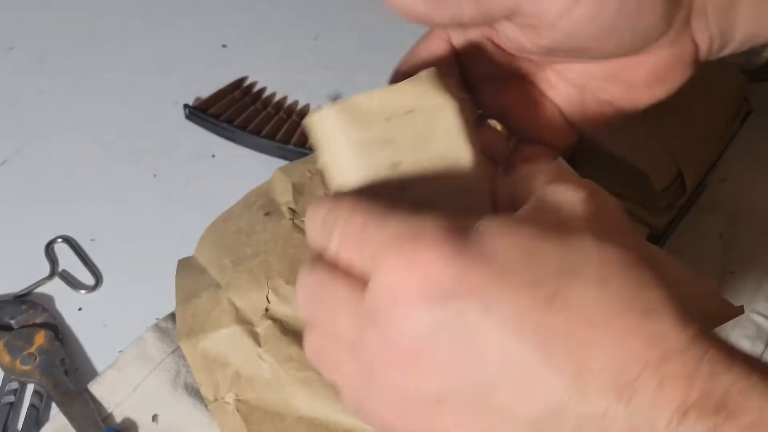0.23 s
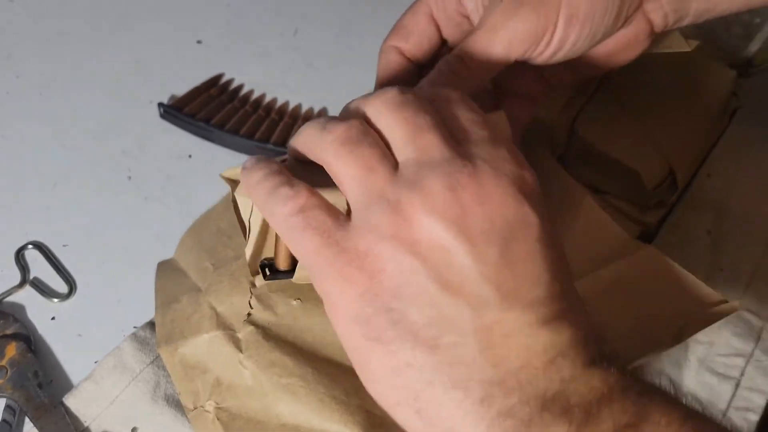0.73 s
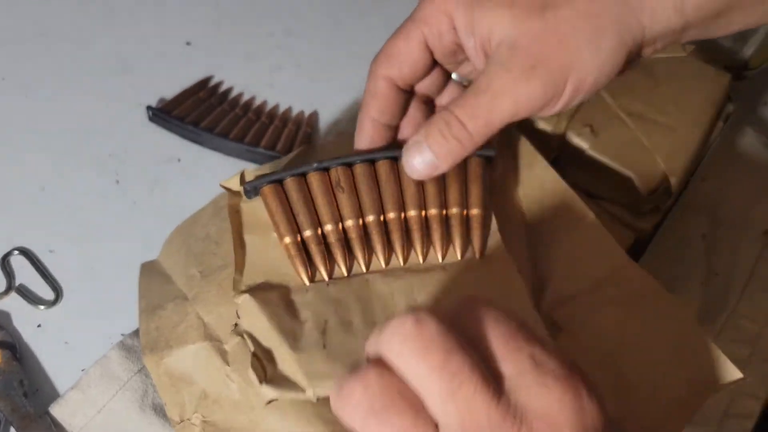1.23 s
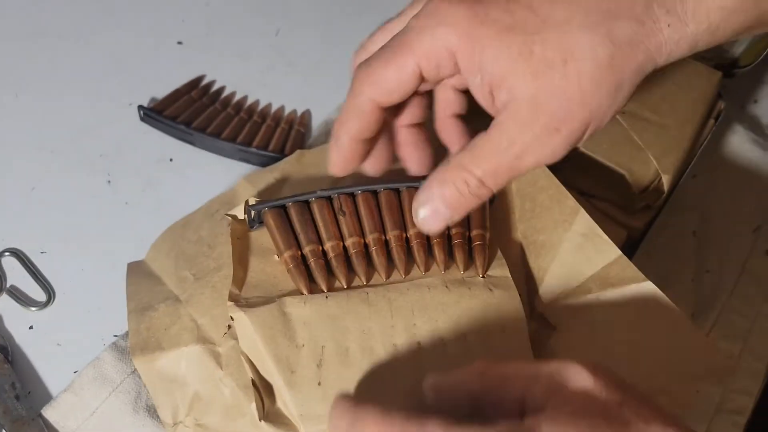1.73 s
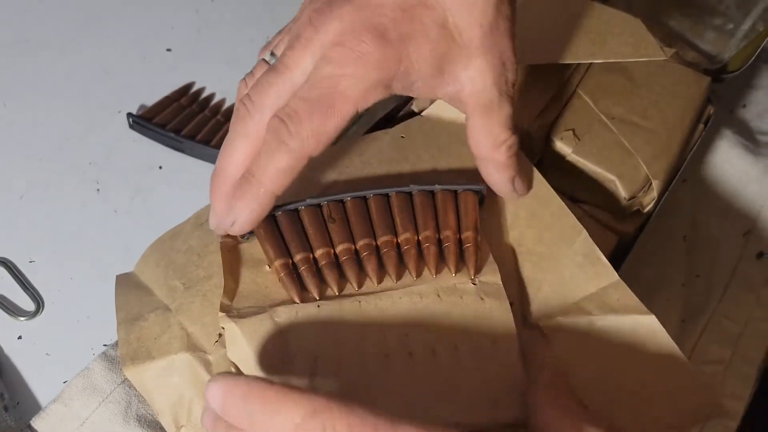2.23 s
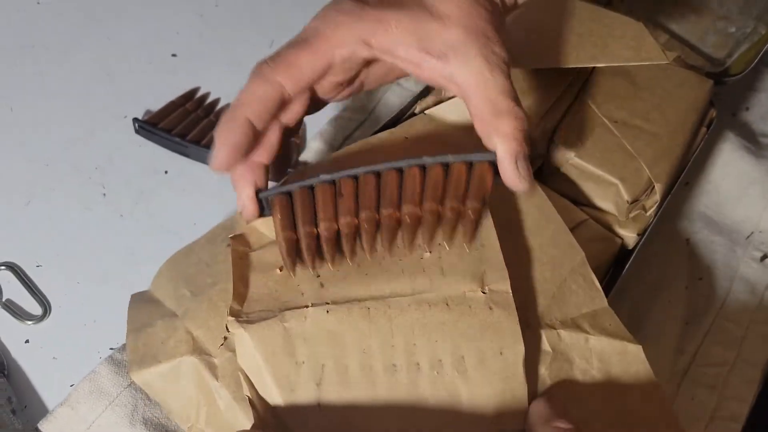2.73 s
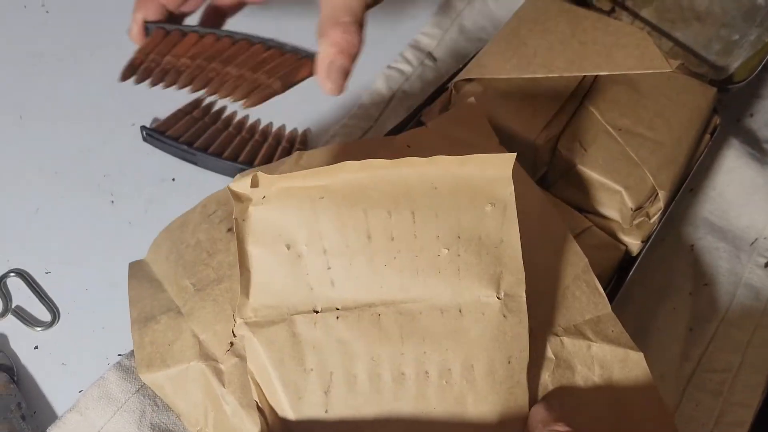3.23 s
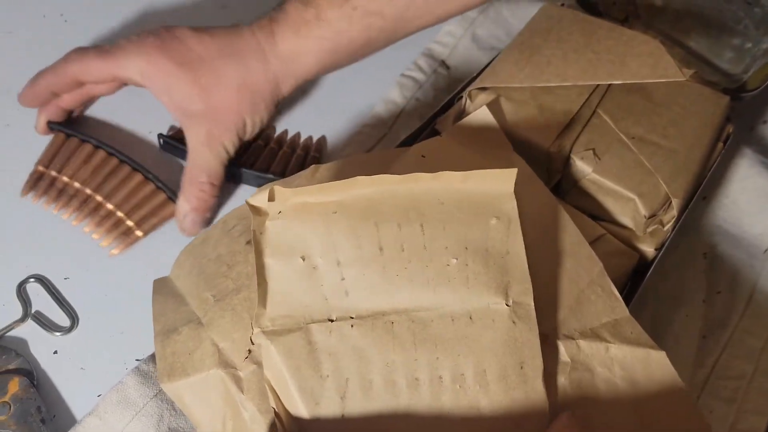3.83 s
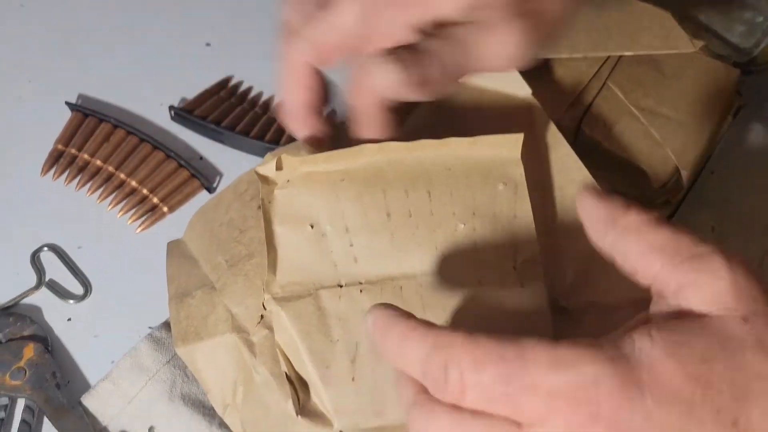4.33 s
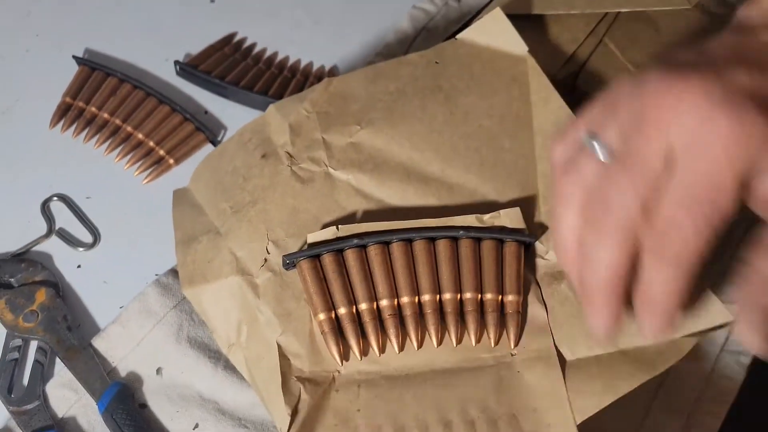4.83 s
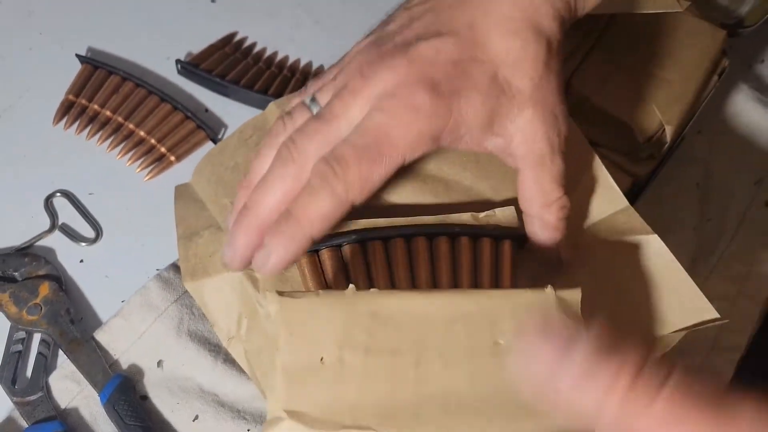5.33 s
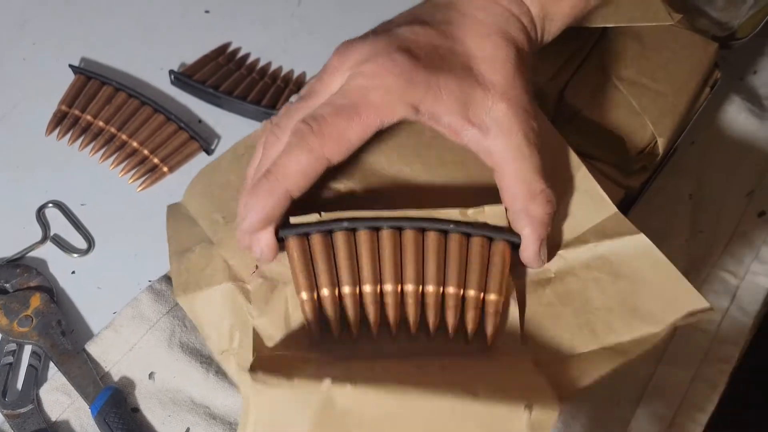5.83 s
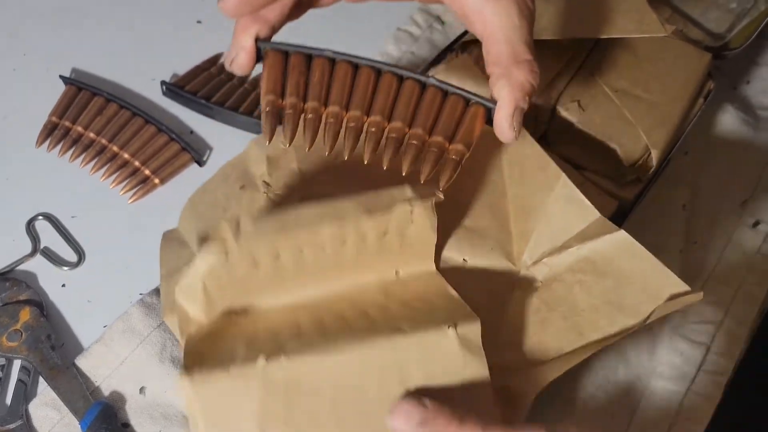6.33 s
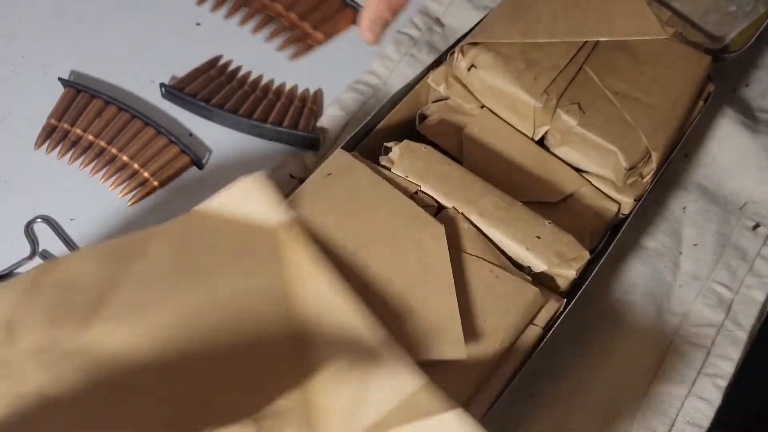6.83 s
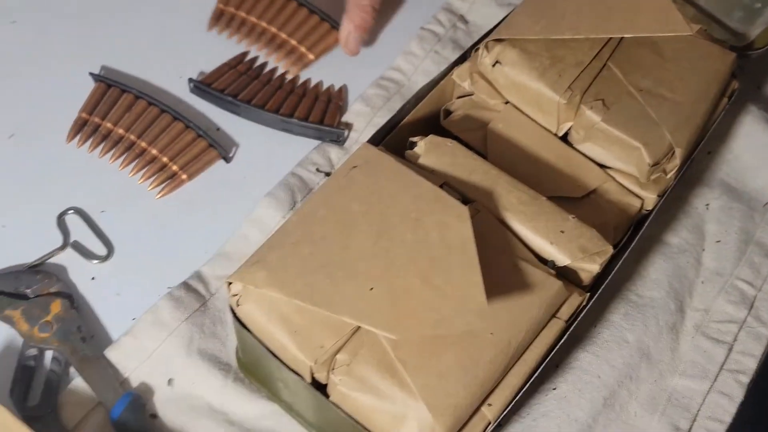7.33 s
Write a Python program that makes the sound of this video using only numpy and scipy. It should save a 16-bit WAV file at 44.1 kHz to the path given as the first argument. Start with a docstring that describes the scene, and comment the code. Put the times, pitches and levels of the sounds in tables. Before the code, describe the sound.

Hands unwrap stiff paper packets close to the microphone in a small room. The paper rustles, and its creases snap in uneven bursts, mixed with light clatters of metal cartridge clips. After a brief lull near the middle, a clip clicks down on the table and the crackling picks up again. A few dull thumps come as packets bump the pile, with a faint hush underneath.

```python
"""Stiff paper packets crackle as hands unwrap them and lay steel cartridge clips on a table.
Creases snap and clips clatter in short bursts of noise, over a rustle of rubbing and tiny cracks.
Hands and packets thump the pile, and moving sheets puff air at a phone just above them.
The ceiling echoes, a small room adds a short tail, and a faint hush lies under it all.
The phone hears in stereo through two ports, the little holes in front of its microphones."""
import sys
import numpy as np
from scipy import signal
from scipy.fft import rfft, irfft
from scipy.io import wavfile
from scipy.ndimage import uniform_filter1d, map_coordinates

SR = 44100
rng = np.random.default_rng(int(sys.argv[2]) if len(sys.argv) > 2 else 0)


def persist_wave(psi):
    """Save psi, clipped to +-1, as 16-bit WAV."""
    counts = np.round(np.clip(psi, -1, 1) * 32767).astype(np.int16)
    wavfile.write(sys.argv[1], SR, np.atleast_2d(counts).T)


N = 334278

# The paper's sound has three ranges: body (low), crisp (middle) and air (high).
# Hand moves that rustle the paper: t/s, hold/s, crisp level/dB, body over crisp/dB, air over crisp/dB,
# crackle (0 is a smooth slide, 1 is full crackle)
HAND_MOVES = [(0, 0.099, -48, -17, 0, 0.5), (0.242, 0.0042, -38, -39, -4, 0.8),
              (0.27, 0.5, -44, -41, -2, 0), (0.353, 0.0049, -31, -24, 2.5, 0.24),
              (0.47, 0.0074, -46.5, -16, 8, 0.8), (0.6, 0.023, -41, -21, -15, 0.4),
              (0.662, 0.092, -37.5, -17, -11, 0.5), (0.785, 0.044, -43, -16, -6, 0.5),
              (0.872, 0.074, -33, -16, -1.5, 0.9), (0.95, 0.55, -44.5, -8, -4, 0.8),
              (1.47, 0.055, -34, -10, -25, 0.7), (1.539, 0.015, -26.5, -7.5, -4, 0.9),
              (1.61, 0.067, -40, -14, -7, 0.56), (1.926, 0.081, -38.5, -18, -6.5, 0),
              (1.96, 0.47, -46.5, -7, -17, 0.9), (2.41, 0.36, -39.5, -11.5, -6, 1),
              (2.78, 0.22, -47.5, -12.5, -24, 0.7), (2.858, 0.031, -38.5, -32, -7.5, 0.7),
              (3.06, 0.4, -64.5, -15, -20, 0.33), (3.521, 0.27, -61.5, 0, -12, 0.16),
              (3.8, 0.2, -59, -15, -22, 0.9), (3.905, 0.022, -38.5, -13, -48, 0.8),
              (4.035, 0.016, -41, -3, -26, 0.75), (4.372, 0.51, -47, -8, -3.5, 0.37),
              (4.68, 0.05, -47, -14, -3, 0.8), (4.86, 0.076, -43, -18, -12.5, 1),
              (5.001, 0.016, -30.5, -1, -10, 1), (5.06, 0.055, -48, 11, -9, 0.83),
              (5.385, 0.023, -51.5, -1.5, -20, 0.14), (5.43, 0.12, -56, -2, -17, 0.6),
              (5.566, 0.38, -40.5, -7.5, -6, 1), (5.991, 0.071, -30, -5.5, -10, 0.65),
              (6.08, 0.17, -39, -16, -0.5, 0.4), (6.3, 0.16, -39, -14, -1.5, 0.7),
              (6.49, 0.04, -52, -15, -3, 0.3), (6.55, 0.063, -40, -19, 0.5, 0.5),
              (6.638, 0.22, -40, -23, 0.5, 0), (6.9, 0.082, -61, -17, -28, 0.8),
              (7.026, 0.0074, -39.5, -17, -6.5, 0.24), (7.171, 0.024, -37, 0.5, -18, 0.5),
              (7.22, 0.13, -43, -13, -21, 0.3), (7.359, 0.2, -36.5, -7.5, -13, 0.47)]
# Creases snapping and clips clattering: peak t/s, crisp level/dB, body over crisp/dB,
# air over crisp/dB, own pitch f/Hz, basic time to fade by 60 dB/s
SNAPS_AND_CLATTERS = [(0.0478, -25, -15.5, -27, 2600, 0.024), (0.2154, -31, -20, -22, 3270, 0.03),
                      (0.2316, -26.5, -20.5, -33.5, 3390, 0.025), (0.3425, -18.5, -44.5, -15, 4650, 0.089),
                      (0.4592, -22.5, -17, -14, 4000, 0.03), (0.493, -40, -2, -18, 3620, 0.033),
                      (0.532, -35.5, -40, -21, 4260, 0.036), (0.6027, -36.5, 0.5, -48, 840, 0.072),
                      (0.7087, -25, -10.5, -22, 3150, 0.077), (0.8664, -39, -20, 1, 4410, 0.03),
                      (0.8928, -13, -16, -20, 3200, 0.028), (0.9023, -8.5, -25, -17.5, 3280, 0.023),
                      (0.948, -17.5, -25, -29, 4940, 0.063), (1.1062, -26.5, -4.5, -33, 3580, 0.023),
                      (1.1377, -30, -24, -15, 3300, 0.03), (1.1835, -31, -10, -8, 5510, 0.02),
                      (1.2048, -10, -23.5, -27, 3630, 0.023), (1.256, -12.5, -21, -24.5, 845, 0.052),
                      (1.272, -10.5, -18.5, -11.5, 3420, 0.036), (1.3068, -15.5, -18.5, -28, 560, 0.03),
                      (1.3423, -20.5, -8, -23.5, 5300, 0.014), (1.3733, -21.5, -11, -25, 1280, 0.043),
                      (1.4115, -21.5, -3.5, -28.5, 1090, 0.013), (1.4633, -29, -11.5, -23.5, 1360, 0.034),
                      (1.5037, -21, -26, -29, 3280, 0.025), (1.5269, -7.5, -20.5, -20, 3420, 0.036),
                      (1.5338, -6.5, -20.5, -16.5, 4870, 0.019), (1.5575, -8, -17, -25, 2250, 0.037),
                      (1.5713, -8, -15.5, -22.5, 3990, 0.023), (1.6497, -15, -11, -34, 1766, 0.031),
                      (1.6713, -17, -13.5, -24, 1060, 0.032), (1.905, -32.5, -26, -16, 2980, 0.063),
                      (2.0537, -23, -13.5, -13, 970, 0.037), (2.0811, -9, -18, -21, 920, 0.024),
                      (2.105, -20.5, -14, -27, 870, 0.047), (2.1568, -23.5, -7.5, -51, 910, 0.022),
                      (2.2501, -11, -15, -27, 3230, 0.011), (2.3077, -21.5, -10.5, -17, 980, 0.02),
                      (2.401, -23, -19, -32, 786, 0.035), (2.4112, -12, -8.5, -23.5, 3380, 0.026),
                      (2.4458, -21, -16.5, -45, 1830, 0.034), (2.5365, -8, -21, -14.5, 3960, 0.023),
                      (2.5644, -26.5, -3, -23, 1318, 0.024), (2.6108, -23, -5.5, -32.5, 4670, 0.02),
                      (2.6252, -13, -13.5, -25, 830, 0.02), (2.6388, -12, -11.5, -9, 5650, 0.032),
                      (2.669, -21.5, -19, -20, 4180, 0.064), (2.7067, -15.5, -20, -21, 2880, 0.033),
                      (2.7506, -21, -15, -21, 877, 0.018), (2.818, -17, -21.5, -28, 1180, 0.016),
                      (2.8696, -22, -53, -17, 3600, 0.043), (2.885, -25, -30, -12, 4590, 0.03),
                      (2.9104, -31, -10, -26, 4260, 0.03), (2.9342, -25.5, -6.5, -46.5, 3200, 0.039),
                      (2.9504, -29.5, -12, -36, 3180, 0.027), (2.9834, -23, -21, -30.5, 3540, 0.028),
                      (3.0013, -12, -36, -32.5, 5060, 0.025), (3.1264, -41.5, -18, -46, 1012, 0.03),
                      (3.531, -48.5, -33, -25, 3570, 0.052), (3.6064, -47.5, 4, -29, 1420, 0.027),
                      (3.7915, -39.5, 8.5, -30, 1310, 0.027), (3.8056, -27, -11, -42, 3400, 0.014),
                      (3.8824, -15.5, -11, -41.5, 3250, 0.049), (4.0124, -28.5, 1.5, -42, 1340, 0.053),
                      (4.0218, -23, -19, -40, 2980, 0.04), (4.0325, -17.5, -14, -47, 2810, 0.045),
                      (4.121, -43, -27, -37, 3480, 0.042), (4.36, -27, -25, -16, 3520, 0.041),
                      (4.383, -35, -13, -29, 3450, 0.03), (4.4653, -35, -14, -22, 3040, 0.03),
                      (4.4804, -30.5, -7, -36, 1220, 0.03), (4.5046, -30, -9.5, -32, 3440, 0.022),
                      (4.5173, -19, -16, -32, 980, 0.033), (4.6134, -35, -2, -28, 721, 0.075),
                      (4.656, -36.5, 0, -15, 845, 0.038), (4.6846, -25, -6.5, -33.5, 890, 0.023),
                      (4.7985, -33.5, -4, -34, 894, 0.03), (4.8354, -23, -31, -49.5, 905, 0.051),
                      (4.8434, -3.5, -20, -24, 3970, 0.037), (4.8874, -28.5, -3, -23.5, 1110, 0.025),
                      (4.9292, -14, -8.5, -13.5, 4800, 0.09), (4.9553, -17, -22, -16.5, 4070, 0.034),
                      (4.9911, -6.5, -9, -21, 3780, 0.02), (5.069, -20, -9.5, -25.5, 1445, 0.045),
                      (5.118, -33.5, -14, -6, 3630, 0.025), (5.1367, -36.5, -2, -8.5, 633, 0.04),
                      (5.377, -37, -14.5, -25, 4940, 0.062), (5.5505, -28, -11, -16, 4300, 0.035),
                      (5.5888, -20, -13, -23, 4110, 0.03), (5.6001, -17.5, -16, -41, 895, 0.023),
                      (5.657, -32.5, 15.5, -24, 1370, 0.034), (5.7426, -14, -15, -22.5, 3950, 0.015),
                      (5.7713, -18, -32, -21.5, 3830, 0.03), (5.7932, -23, -11.5, -25, 1020, 0.034),
                      (5.8445, -22, -16.5, -16.5, 939, 0.046), (5.9643, -24, -6, -22, 2920, 0.03),
                      (6.0008, -12, -29, -24, 3800, 0.01), (6.0292, -10.5, -18, -26, 3470, 0.052),
                      (6.0544, -17, -26, -43, 3110, 0.047), (6.072, -20.5, -10, -29, 1350, 0.041),
                      (6.091, -19.5, -20, -29, 3170, 0.035), (6.1293, -20, -18, -42, 982, 0.064),
                      (6.1507, -28, -1, -28, 1517, 0.077), (6.3, -28.5, -14, -22, 4510, 0.049),
                      (6.353, -31.5, -8, -18, 890, 0.048), (6.4437, -23.5, -16, -29, 3130, 0.087),
                      (6.4584, -23.5, -9, -11, 3460, 0.04), (6.5351, -4.5, -16.5, -27, 1080, 0.019),
                      (6.5697, -14, -23, -17, 4860, 0.026), (6.7096, -31, -21, -26, 4000, 0.037),
                      (6.8747, -50, 2.5, -21, 4910, 0.03), (7.115, -45, 19, -38, 860, 0.034),
                      (7.1437, -23.5, -17, -63, 855, 0.03), (7.1593, -32.5, -11.5, -30, 1070, 0.033),
                      (7.1836, -15.5, -16.5, -39, 2130, 0.033), (7.273, -31, -27, -30, 2640, 0.039),
                      (7.3301, -26.5, -1, -34, 2690, 0.032), (7.3611, -11, -16, -27.5, 3550, 0.023),
                      (7.4077, -16, -22, -51, 800, 0.03), (7.4981, -12.5, -7.5, -29, 1370, 0.019),
                      (7.559, -35, -1.5, -24, 3180, 0.028)]
# How the two ports colour the sound: f/Hz, left level/dB, right level/dB, left phase lead/rad
PORT_RESPONSE = [(150, 0.5, -7, 0.2), (356, -7.5, -5, 0.17), (463, -7, -3.5, 2.27), (519, 1, -6, 2.55),
                 (840, 5, -6.5, 0.99), (970, 3.5, 1, 1.9), (1454, 3, 1.5, 1.95), (1800, -5, -2.5, 5.7),
                 (2180, -1, -0.5, 2.45), (3180, -2, 0.5, 5.47), (5880, -8, -3, 10.24),
                 (7530, -13.5, -15.5, 11), (9000, -25.5, -39.5, 13), (12750, -19.5, -19, 20)]
# Tone colour of the background hush: f/Hz, level/dB
HUSH_SPECTRUM = [(15, -50), (25, 4.5), (169, -8), (260, 3), (469, -2), (782, -9.5), (1710, -11),
                 (4620, -10.5), (6550, -16), (7700, -34.5), (8580, -51), (13200, -21), (15500, -21)]
# Hands and packets pushing the pile: t/s, level/dB
PILE_PUSHES = [(0.733, -55.5), (0.915, -53), (1.267, -53), (1.551, -44.5), (2.09, -61), (2.415, -59),
               (2.937, -64), (3.891, -60), (4.03, -51), (4.362, -58), (4.475, -52), (4.69, -60),
               (4.952, -35), (5.557, -51), (6.05, -45), (6.46, -53), (7.19, -62), (7.365, -52)]
# Tone colour of those pushes: f/Hz, level/dB
PUSH_SPECTRUM = [(24, -29.5), (40, -5.5), (92, -1.5), (172, -1), (263, -2.5), (450, 0), (580, -48),
                 (990, -120)]
# Packets knocking on the pile: t/s, level/dB, f/Hz
PACKET_KNOCKS = [(0.727, -36, 221), (1.259, -54, 130), (1.531, -27.5, 330), (2.410, -28, 297),
                 (2.444, -35, 293), (4.020, -39.5, 199), (4.686, -35.5, 317), (4.947, -30.5, 95.7),
                 (6.028, -35, 300)]
# Air pushed at the ports by moving sheets: middle t/s, level/dB
AIR_PUFFS = [(.98, -62), (1.579, -57), (1.849, -61), (3.99, -61.5), (6.27, -60), (6.8, -71)]

BAND_EDGES_HZ = 220 * 2 ** (np.arange(23) / 3.55)  # the paper's sound is built in narrow bands
BAND_CENTRES_HZ = np.sqrt(BAND_EDGES_HZ[:-1] * BAND_EDGES_HZ[1:])
BIN_HZ = np.fft.rfftfreq(N, 1 / SR)  # the frequency of each point (bin) in a spectrum
TOP_HZ = 15700
FADE_60_DB = np.log(1000)  # exp(-FADE_60_DB * t / t60) falls by 60 dB in t60 seconds


def undb(db):
    """Turn decibels into a gain to multiply by."""
    return 10 ** (np.asarray(db) / 20)


def unit(x):
    """Scale a signal to an average power of 1."""
    return x / np.sqrt(np.mean(x ** 2))


def on_log_hz(hz, values):
    """Join a few points into a curve with a value for every frequency bin."""
    return np.interp(np.log(BIN_HZ + 1), np.log(hz), values)


def coloured(x, spectrum):
    """Give a signal the tone colour in a table of f/Hz, level/dB."""
    return irfft(rfft(x) * undb(on_log_hz(*np.transpose(spectrum))), N)


def wander(per_s):
    """A smooth random curve that heads for a new value per_s times a second."""
    hold = int(SR / per_s)
    steps = np.repeat(rng.standard_normal(N // hold + 1), hold)
    return unit(uniform_filter1d(uniform_filter1d(steps, hold), hold)[:N])


def blend(body_db, crisp_db, air_db, band):
    """Mix the levels of the three ranges into the level of one band."""
    pitch, anchors = np.log(BAND_CENTRES_HZ[band]), np.log([1200, 2100, 4500, 9500])
    body_share = np.interp(pitch, anchors, [0.56, 0.02, 0, 0.0077])
    air_share = np.interp(pitch, anchors, [0.004, 0.00068, 0.1, 0.68])
    return crisp_db + body_share * (body_db - crisp_db) + air_share * (air_db - crisp_db)


def strokes(at_s, hold_s, db, rise_db_per_s, fall_db_per_s):
    """The total level in dB of hand strokes that each swell, hold and die away."""
    t = np.arange(0, N / SR + .002, .002)[:, None]
    before_s, after_s = np.maximum(at_s - t, 0), np.maximum(t - at_s - hold_s, 0)
    each_db = db - rise_db_per_s * before_s - fall_db_per_s * after_s
    power = np.sum(undb(2 * each_db), axis=1)
    return np.interp(np.arange(N) / SR, t[:, 0], 10 * np.log10(power + 1e-12))


def rustle():
    """Paper rubs while hands move: gives crisp, body and air levels in dB, and the share of crackle."""
    at_s, hold_s, db, body_db, air_db, crackle = np.transpose(HAND_MOVES)
    crackle_db = 10 * np.log10(np.clip(crackle, .01, 1))
    crisp, body, air, cracked = (
        strokes(at_s, hold_s, db + extra_db, rise_db_per_s=455, fall_db_per_s=269)
        for extra_db in (0, body_db, air_db, crackle_db))
    return crisp, body, air, undb(2 * (cracked - crisp))


def cracks(count=1800, spread_db=6.5, tint_db=7, smooth_rub=0.88, rise_s=.0012, t60_s=.035):
    """Paper gives way in tiny random cracks: yields their power over a smooth rub, band by band."""
    when, chance = rng.random((2 * count)).reshape(count, 2).T
    size_db = -spread_db * np.log(chance + .04)  # many small cracks, few big ones
    tint = uniform_filter1d(rng.standard_normal((count, len(BAND_EDGES_HZ))), size=3)
    rise_and_fade = np.poly([np.exp(-2 * FADE_60_DB / (t60_s * SR)), np.exp(-1 / (rise_s * SR))])
    for band in range(len(BAND_CENTRES_HZ)):
        size = undb(size_db + tint_db * tint[:, band])  # each crack has its own tone colour
        clicks = np.zeros(N)
        np.add.at(clicks, (when * N).astype(int), size ** 2)
        power = signal.lfilter([1], rise_and_fade, clicks)
        yield smooth_rub + power / np.median(uniform_filter1d(power, size=4000))


def snaps_and_clatters(band, pitch_boost_db=7, pitch_width_octaves=0.18, linger=0.34):
    """A crease snaps or a clip lands: power in one band, boosted and longer near its own pitch."""
    power = np.zeros(N)
    for peak_s, db, body_db, air_db, hz, t60_s in SNAPS_AND_CLATTERS:
        rise_s = 0.061 * t60_s  # slow crunches also swell slowly
        start = int((peak_s - rise_s) * SR)
        t = np.arange(min(int(.25 * SR), N - start)) / SR
        closeness = np.exp(-.5 * (np.log2(BAND_CENTRES_HZ[band] / hz) / pitch_width_octaves) ** 2)
        fade_s = t60_s * (1 + linger * closeness)
        shape = np.minimum(t / rise_s, np.exp(-FADE_60_DB * (t - rise_s) / fade_s))
        gain = undb(db + pitch_boost_db * closeness + blend(body_db, 0, air_db, band))
        power[start:start + len(t)] += (gain * shape) ** 2
    return power


def paper_and_clips(snap_trim_db=(2, -8, 2), rustle_trim_db=-5, grit_db=3, drift_db=2.5, apart_hz=2500):
    """Rustle, snaps and clatters shape the same noise in all bands, so a crack is one broad click."""
    crisp_db, body_db, air_db, crackle = rustle()
    pickup_db = port_pickup_db()
    grit = unit(undb(grit_db * wander(per_s=1500)))  # fibres give way in sharp, uneven jerks
    noise, other_noise = grit * rng.standard_normal((2, N))
    drift = [wander(per_s=14) for _ in BAND_EDGES_HZ[::2]]  # the rub's colour wanders, in band pairs
    slope_hz = np.r_[150, BAND_CENTRES_HZ]  # each band slopes away to its neighbours' centres
    spectrum = 0
    for band, crack_power in enumerate(cracks()):
        rub_db = blend(body_db, crisp_db, air_db, band) + rustle_trim_db + drift_db * drift[band // 2]
        rustle_power = undb(2 * rub_db) * (1 + crackle * (crack_power - 1))
        snap_power = snaps_and_clatters(band) * undb(2 * blend(*snap_trim_db, band))
        loudness = np.sqrt(rustle_power + snap_power) / undb(blend(*pickup_db, band))
        # The sheet is wide: short waves from its parts add up differently at each port.
        angle = np.arctan(BAND_EDGES_HZ[band] / apart_hz)
        stereo_noise = np.array([noise, np.cos(angle) * noise + np.sin(angle) * other_noise])
        band_filter = on_log_hz(slope_hz, np.arange(len(slope_hz)) == band + 1)
        spectrum = spectrum + band_filter * rfft(stereo_noise * loudness)
    return irfft(spectrum, N)


def hand_drift(stereo, lag_samples=1.93):
    """The hands wander, so the right port hears them a little earlier or later."""
    left, right = stereo
    read_at = np.arange(N) + lag_samples * wander(per_s=4)
    return np.array([left, map_coordinates(right, [read_at], order=3, mode="nearest")])


def room(stereo, onset_s=0.0005, t60_s=0.1, tail_db=-9, ceiling_s=0.0085, ceiling_db=-11):
    """Sound bounces back as one ceiling echo and a fading cloud of echoes, different at each port."""
    t = np.arange(int(.4 * SR)) / SR
    echoes = rng.standard_normal((2, len(t))) * np.exp(-FADE_60_DB * t / t60_s)
    echoes *= 1 - np.exp(-t / onset_s)
    echoes = signal.sosfilt(signal.butter(1, (300, 6000), "band", fs=SR, output="sos"), echoes)
    echoes *= undb(tail_db) / np.sqrt(np.sum(echoes ** 2, axis=1, keepdims=True))
    echoes[:, int(ceiling_s * SR)] += undb(ceiling_db)
    return signal.fftconvolve(stereo, echoes, axes=1)[:, :N]


def port_gains():
    """Each port changes the strength and timing of every frequency in its own way."""
    hz, left_db, right_db, lead_rad = np.transpose(PORT_RESPONSE)
    turn = np.exp(.5j * on_log_hz(hz, lead_rad))
    return np.array([undb(on_log_hz(hz, left_db)) * turn, undb(on_log_hz(hz, right_db)) / turn])


def port_pickup_db(splits_hz=(1600, 8500)):
    """How much of an even noise the ports pick up in the body, crisp and air ranges."""
    power = np.mean(np.abs(port_gains()) ** 2, axis=0)
    ranges = np.searchsorted(splits_hz, BIN_HZ)
    in_use = (BIN_HZ >= BAND_EDGES_HZ[0]) & (BIN_HZ < TOP_HZ)
    return [10 * np.log10(power[in_use & (ranges == i)].sum() / len(power)) for i in range(3)]


def hush(db=-71, shared_gain=0.81):
    """The room and the microphones make a faint steady noise, partly the same on both sides."""
    shared, left, right = (unit(coloured(rng.standard_normal(N), HUSH_SPECTRUM)) for _ in range(3))
    return undb(db) * (shared_gain * shared + np.array([left, right]))


def pile_thumps(floor_db=-81):
    """Each push on the pile swells a faint low rumble into a thump; gives two separate noises."""
    at_s, db = np.transpose(PILE_PUSHES)
    push = undb(strokes(at_s, 0, db, rise_db_per_s=300.5, fall_db_per_s=166)) + undb(floor_db)
    return push * unit(coloured(rng.standard_normal((2, N)), PUSH_SPECTRUM))


def knocks(rise_s=0.0026, cycles_to_fade=8.4):
    """A packet hits the pile, which gives a short, dull ring at one low pitch."""
    out, t = np.zeros(N), np.arange(SR // 5) / SR
    for at_s, db, hz in PACKET_KNOCKS:
        shape = np.exp(-FADE_60_DB * t * hz / cycles_to_fade) * (1 - np.exp(-t / rise_s))
        ring = np.sin(2 * np.pi * hz * t) * shape
        start = int(at_s * SR)
        out[start:start + len(t)] += undb(db) * ring / np.max(np.abs(ring))
    return out


def air_puffs(band_hz=(22, 60), width_s=0.053):
    """Moving sheets push air at the ports in soft, very deep swells; gives two separate noises."""
    t = np.arange(N) / SR
    deep_filter = signal.butter(2, band_hz, "band", fs=SR, output="sos")
    wind = signal.sosfilt(deep_filter, rng.standard_normal((2, N)))
    swell = sum(undb(db) * np.exp(-.5 * ((t - middle_s) / width_s) ** 2) for middle_s, db in AIR_PUFFS)
    return swell * unit(wind)


def scene(low_width=0.25, low_left_db=0.5):
    """Paper and clips pass through the room and the ports; the low sounds and the hush are added."""
    direct = hand_drift(paper_and_clips())
    heard = irfft(rfft(direct + room(direct)) * port_gains(), N)
    middle, side = pile_thumps() + air_puffs()
    middle = middle + knocks()
    # Low sounds reach both ports almost alike.
    lows = np.array([undb(low_left_db) * (middle + low_width * side), middle - low_width * side])
    return heard + lows + hush()


def record(dry, ceiling=.9):
    """The phone rounds off the loudest peaks and cuts the highest treble."""
    rounded = ceiling * np.tanh(dry / ceiling)
    return signal.sosfilt(signal.ellip(8, .2, 70, TOP_HZ, fs=SR, output="sos"), rounded)


dry = scene()
out = record(dry)
persist_wave(out)
```